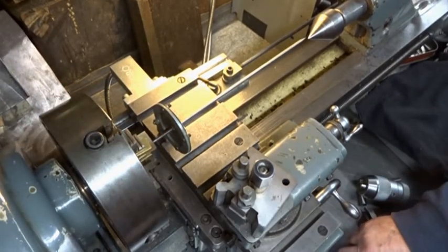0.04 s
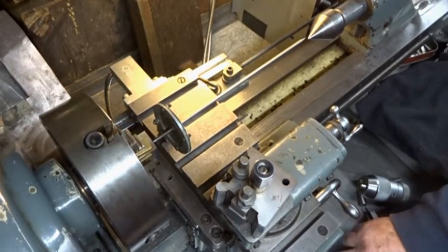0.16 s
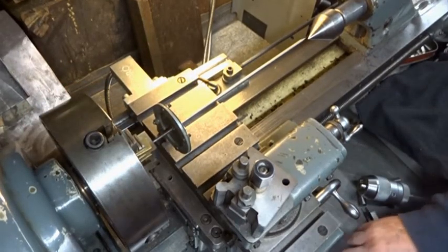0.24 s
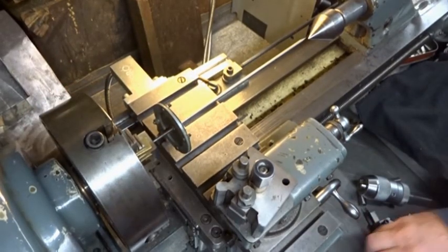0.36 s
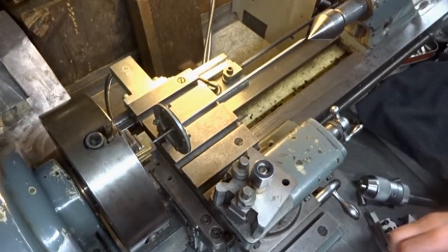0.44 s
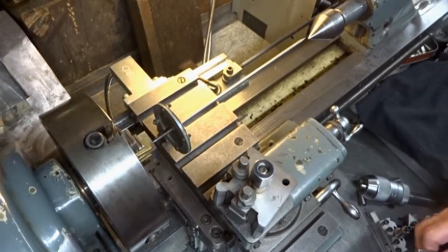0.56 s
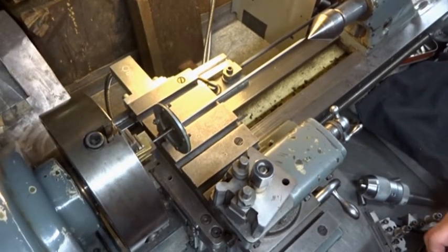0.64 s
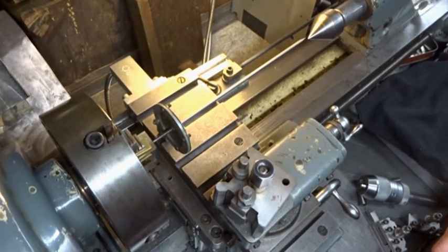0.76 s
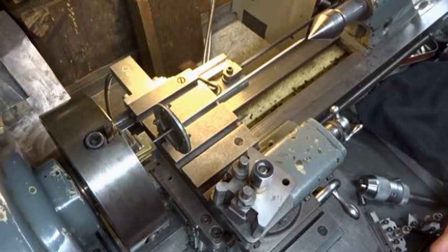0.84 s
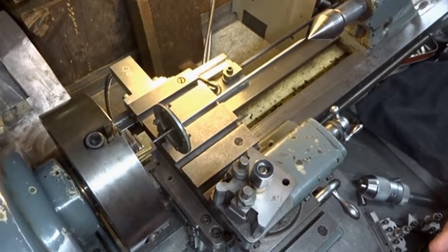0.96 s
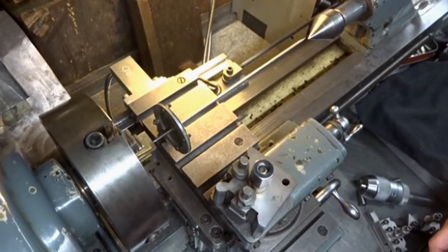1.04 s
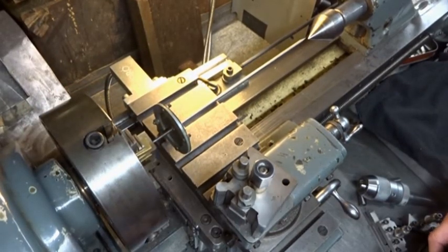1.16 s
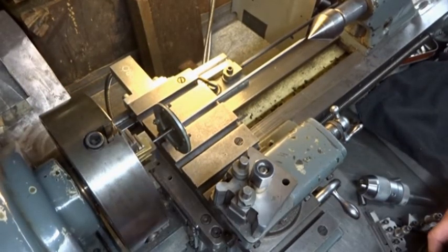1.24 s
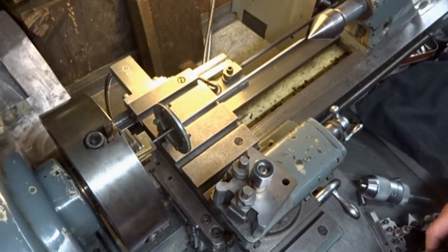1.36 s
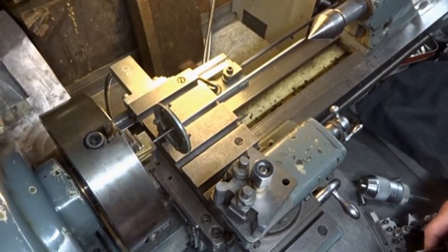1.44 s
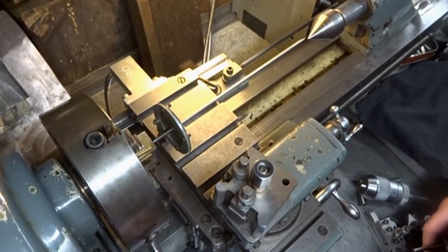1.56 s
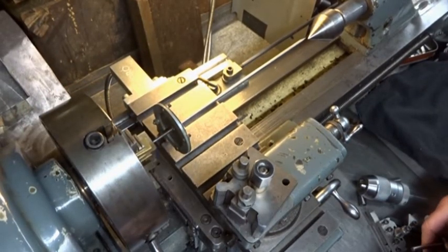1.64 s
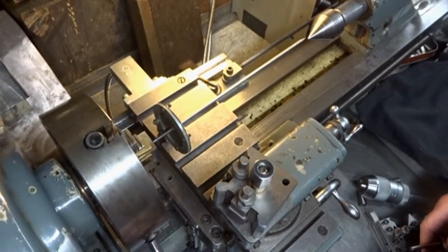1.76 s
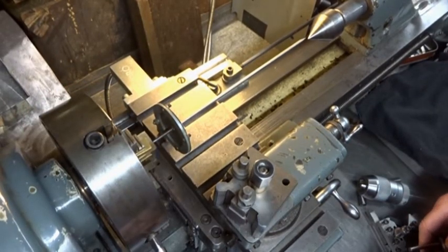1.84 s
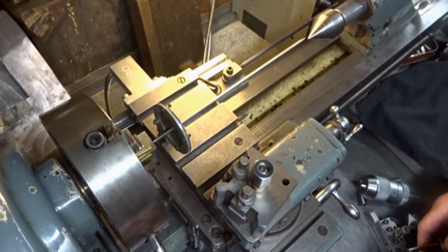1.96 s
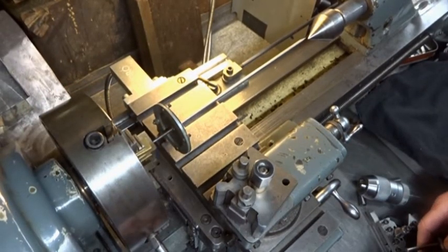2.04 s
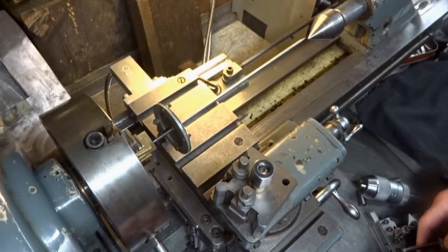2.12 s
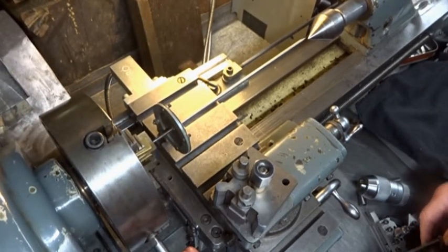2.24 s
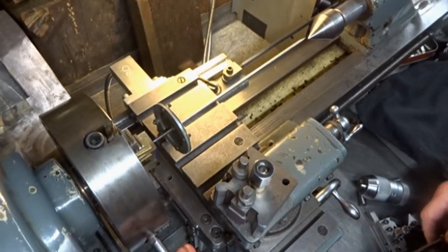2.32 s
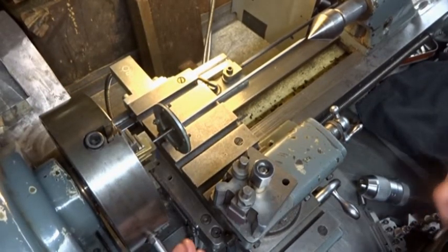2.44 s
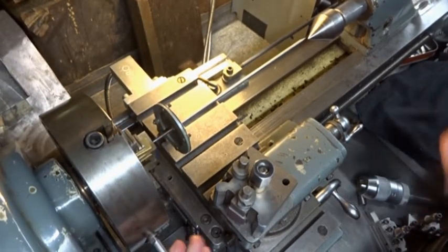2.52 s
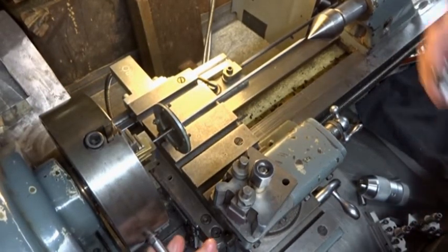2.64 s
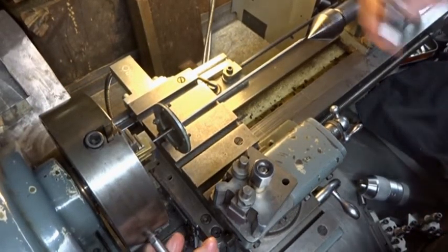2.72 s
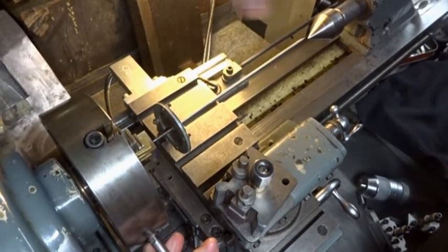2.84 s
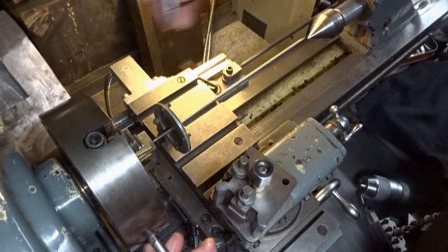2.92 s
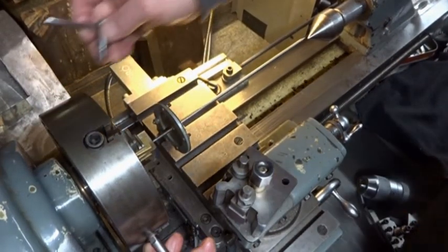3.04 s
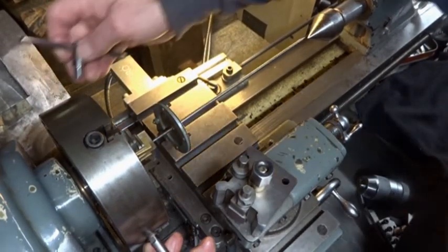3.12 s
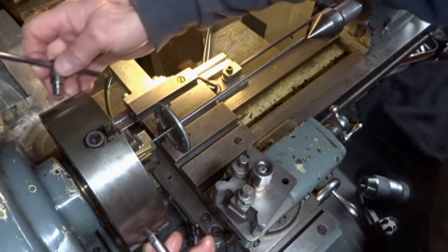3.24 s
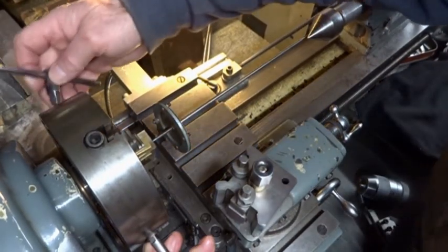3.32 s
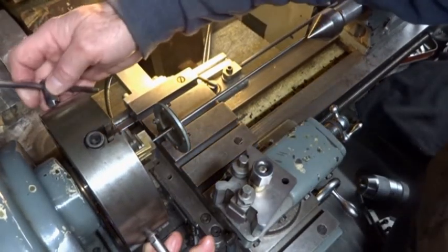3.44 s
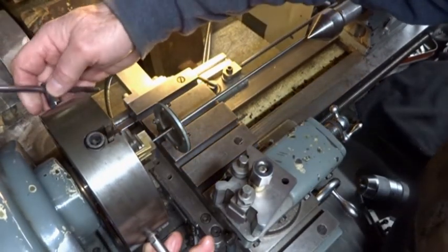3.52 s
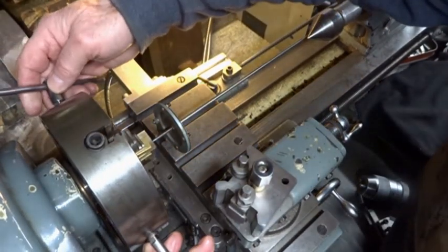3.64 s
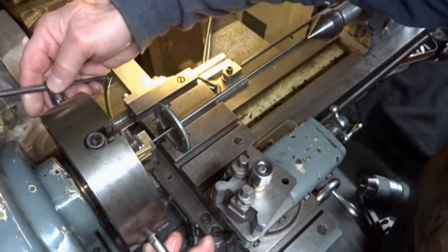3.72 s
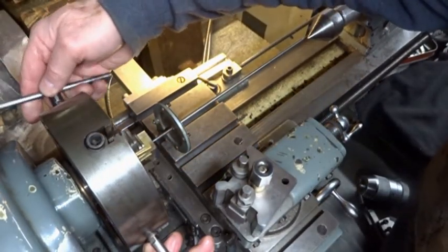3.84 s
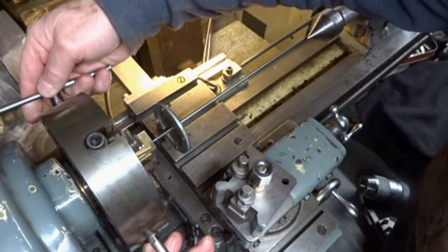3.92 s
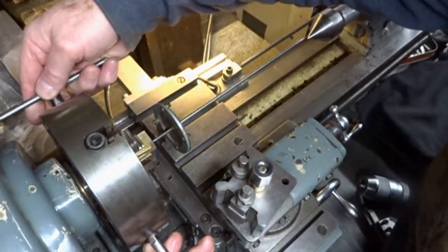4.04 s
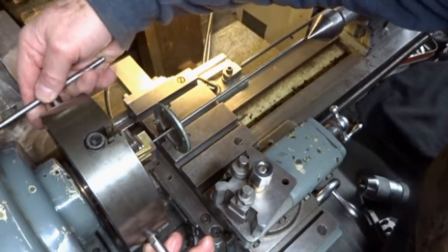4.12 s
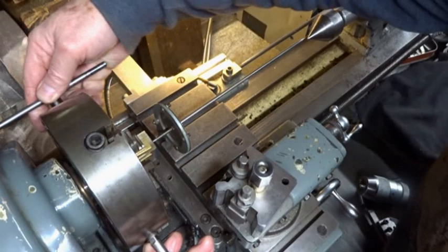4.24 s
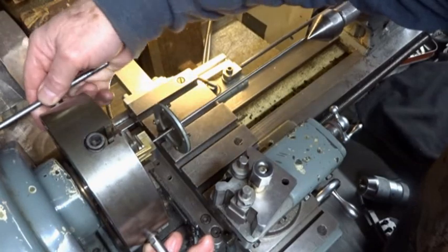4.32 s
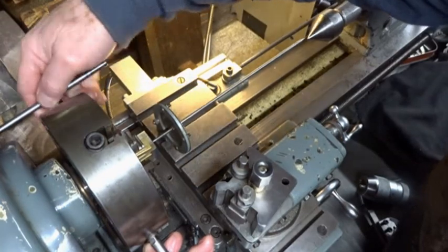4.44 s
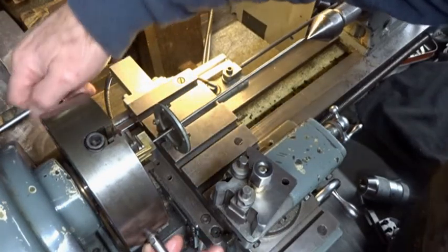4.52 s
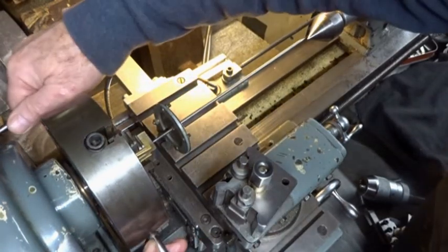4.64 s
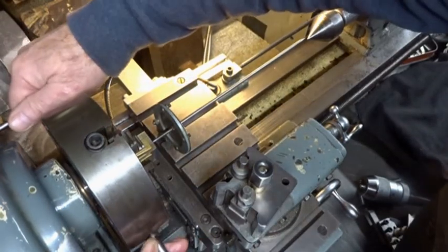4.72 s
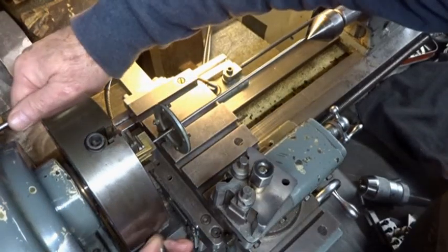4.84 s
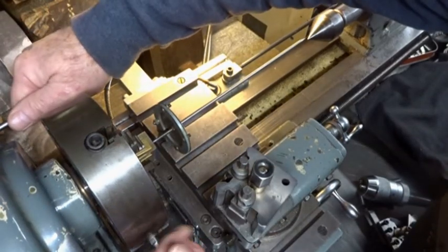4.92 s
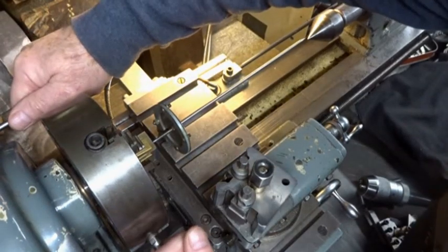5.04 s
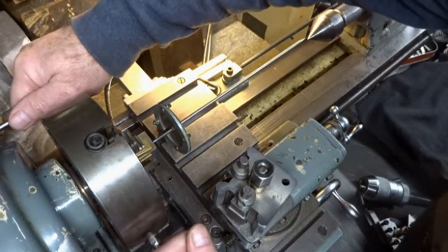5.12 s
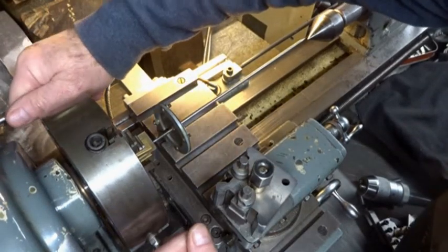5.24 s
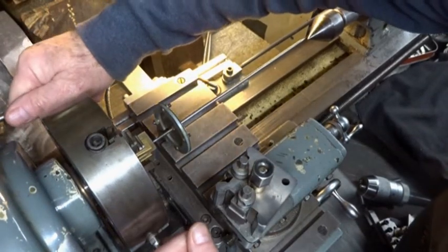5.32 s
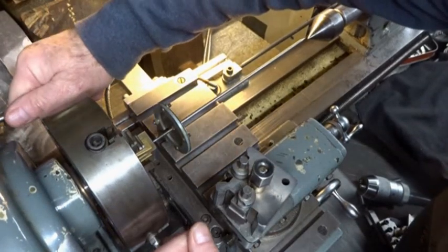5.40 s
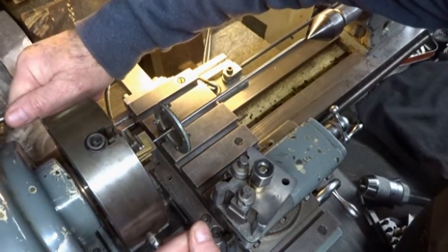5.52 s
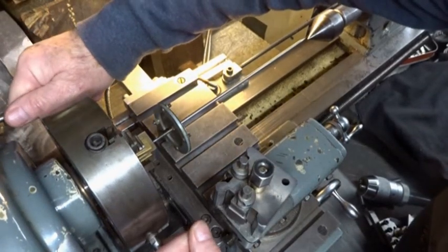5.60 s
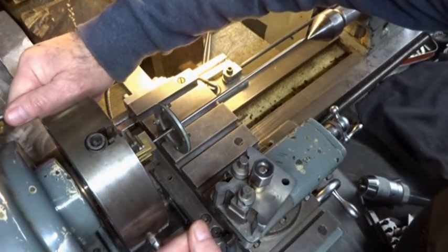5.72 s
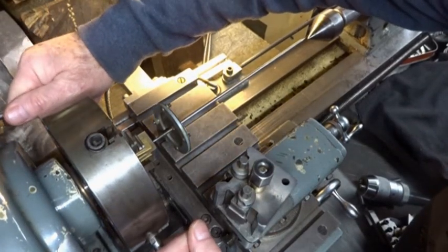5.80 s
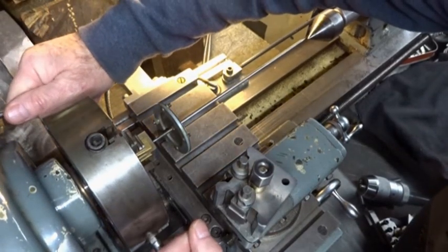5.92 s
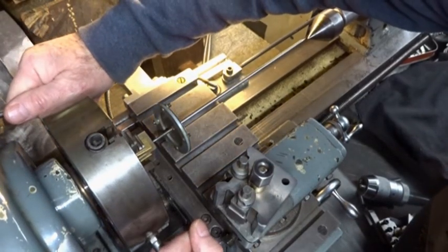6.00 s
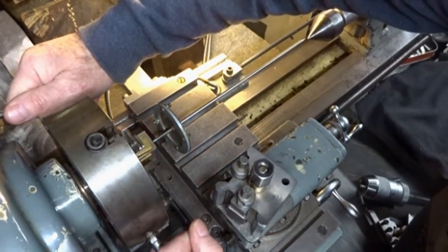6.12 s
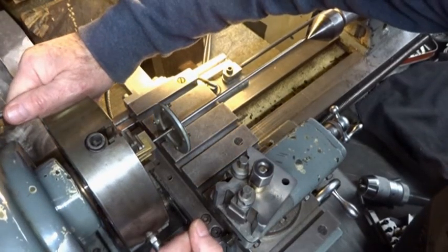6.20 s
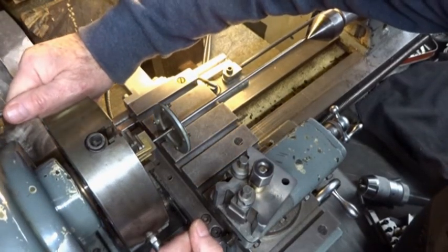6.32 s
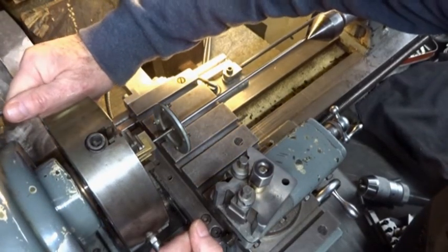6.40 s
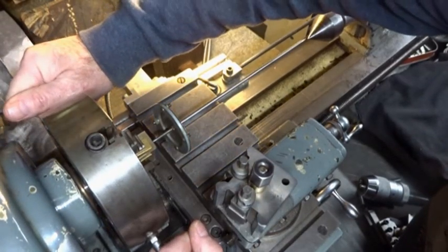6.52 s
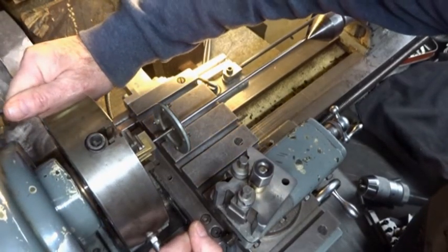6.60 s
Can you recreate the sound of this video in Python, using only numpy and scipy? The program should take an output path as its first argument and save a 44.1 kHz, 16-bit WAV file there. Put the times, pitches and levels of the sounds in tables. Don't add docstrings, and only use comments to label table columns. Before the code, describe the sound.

A metal clang and scraping clatter of steel keys dragged off a tray, then small clicks and rattles as they fit into a lathe chuck.

```python
import sys
import numpy as np
from scipy import signal
from scipy.fft import rfft, irfft, next_fast_len
from scipy.io import wavfile
from scipy.ndimage import map_coordinates

SR = 44100
rng = np.random.default_rng(int(sys.argv[2]) if len(sys.argv) > 2 else 0)


def voltage_ratio(decibels):
    exponent = np.asarray(decibels, float) / 20
    return 10 ** exponent


def file_out(sig):
    cols = np.atleast_2d(sig).T
    lim = np.clip(cols, -1, 1)
    pcm = np.round(lim * 32767).astype(np.int16)
    wavfile.write(sys.argv[1], SR, pcm)


N = 293688


def unit(x):
    return x / np.sqrt(np.mean(x ** 2) + 1e-20)


def peaked(x):
    return x / np.abs(x).max()


def along(points, hz):
    f, v = np.transpose(points)
    return np.interp(np.log(hz + 1), np.log(f + 1), v)


def wobble(rate):
    knots = rng.standard_normal(int(N * rate / SR) + 4)
    return map_coordinates(knots, [np.arange(N) * rate / SR])


def filtered(x, response):
    n = x.shape[-1]
    m = next_fast_len(n + 8192)
    return irfft(rfft(x, m) * response(np.fft.rfftfreq(m, 1 / SR)), m)[..., :n]


def toned(points):
    return lambda hz: voltage_ratio(along(points, hz))


def resonant(peaks):
    def response(f):
        total = 0
        for k, (centre, width, db) in enumerate(peaks):
            mode = 1j * f * width / (centre * centre - f * f + 1j * f * width)
            total = total + (-1) ** k * voltage_ratio(db) * mode
        return total
    return response


def paired(two, alike):
    def mid_side(hz):
        turn = np.arccos(np.clip(along(alike, hz), -1, 1)) / 2
        return np.array([np.cos(turn), np.sin(turn)])
    mid, side = filtered(two, mid_side)
    return np.array([mid + side, mid - side])


def rush(response, alike, grain_db, grain_hz=120):
    rough = voltage_ratio(grain_db * wobble(grain_hz)) * rng.standard_normal((2, N))
    return unit(paired(filtered(rough, response), alike))


def strokes(rows, lift_db=0, per_db=0):
    swell_from_db = 11
    t = np.arange(N) / SR
    gains = []
    for row in rows:
        s, swell, top_db, t60 = row[:4]
        after = t - s - swell
        shape = np.where(after < 0, swell_from_db * after / swell, -60 * after / t60) + top_db
        gains.append(voltage_ratio(np.maximum(shape, -200) + lift_db + per_db * row[-1]))
    return np.max(gains, axis=0)


# f/Hz, t60/s
SHOP_DECAY = [(200, 0.64), (1000, 0.43), (4000, 0.22), (12000, 0.031)]
# f/Hz, likeness/1
ROOM_ALIKE = [(200, 0.62), (2000, 0.6), (12000, 0.78)]


def echo(x):
    hz, t, z = signal.stft(rng.standard_normal((2, len(x))), SR, nperseg=256)
    decay = voltage_ratio(-60 * t / along(SHOP_DECAY, hz)[:, None])
    tail = signal.istft(z * decay, SR, nperseg=256)[1]
    walls = tail / np.linalg.norm(tail[0])
    both = signal.fftconvolve(x[None], walls, axes=1)[:, :len(x)]
    return paired(both, ROOM_ALIKE)


def add(out, s, near, room_db):
    out[:, round(s * SR):][:, :near.shape[1]] += near + voltage_ratio(room_db) * echo(near.mean(0))


# f/Hz, likeness/1
NEAR_ALIKE = [(60, 0.92), (240, 0.9), (950, 0.95), (3800, 0.88), (15000, 0.93)]


def blow(t60, top_db, tone, steel, ring_db, body, knock_db, chatter, knock_t60):
    t = np.arange(SR // 2) / SR
    rise_s, first_share = 0.00099, 0.91
    meeting = 1 - (1 - first_share) * np.exp(-t / rise_s)

    def bright(hz):
        return toned(tone)(hz) * voltage_ratio(top_db / (1 + (6500 / (hz + 1)) ** 6))

    fading = meeting * voltage_ratio(-60 * t ** 2 / (t + 0.21 * t60) / t60)
    clatter = peaked(filtered(rng.standard_normal((2, len(t))), bright) * fading)
    rebounds = rng.standard_normal(len(t)) ** 3 * voltage_ratio(-60 * t / (0.44 * t60)) * meeting
    ring = peaked(filtered(rebounds, resonant(steel)))
    push = rng.standard_normal((2, len(t))) * t / (chatter + t) * voltage_ratio(-60 * t / knock_t60)
    knock = peaked(filtered(push, resonant(body)))
    return paired(clatter + voltage_ratio(knock_db) * knock, NEAR_ALIKE) + voltage_ratio(ring_db) * ring


def taps(hits, steel, tone, body, grip, chatter, knock_t60, room_db, ring_db):
    out = np.zeros((2, N + SR))
    held = np.multiply(steel, [1, grip, 1])
    for s, db, knock_db, hard_db, t60 in hits:
        woken_db = ring_db + 0.9 * hard_db
        sound = blow(t60, hard_db, tone, held, woken_db, body, knock_db, chatter, knock_t60)
        add(out, s, voltage_ratio(db) * sound, room_db)
    return out[:, :N]


# t/s, peak level/dB, relative knock level/dB, hardness/dB, clatter t60/s
TRAY_HITS = [
    (0.0006, -9.5, -12, -2, 0.11),
]
SHIFT_HITS = [
    (0.2278, -20, -8, -9, 0.13),
]
CLACK_HITS = [
    (0.8888, -10.5, -3.5, 5.7, 0.13),
]
# f/Hz, width/Hz, level/dB
TRAY_STEEL = [(1260, 50, 2), (1512, 65, 0), (2980, 68, -4), (3780, 60, -6.5), (6170, 70, -4), (7700, 51, 3),
              (8990, 40, -16), (11900, 200, -14), (13080, 140, -18)]
SHIFT_STEEL = [(1770, 46, 2), (2680, 100, -10), (3380, 160, -1), (7000, 80, -6), (8200, 200, -6.5)]
CLACK_STEEL = [(2612, 63, 1), (3420, 100, -2.5), (4730, 80, -13), (5400, 120, -8), (6680, 70, -12),
               (7200, 60, -2), (7600, 120, -5.5), (8520, 90, -10), (9860, 90, -8), (9690, 90, -11),
               (10350, 110, 0.5), (11190, 110, -11), (12270, 100, -8), (15050, 500, -4)]
# f/Hz, level/dB per Hz
TRAY_TONE = [(880, -8), (1500, -5.5), (1610, -11), (2660, -12), (4080, -12.5), (5070, -16), (9100, -16.5),
             (10300, -16), (16000, -20)]
# f/Hz, width/Hz, level/dB
PAN = [(445.6, 15, 6.5), (678, 27, -2), (806, 53, 3), (1176, 44, -6), (1403, 60, -8)]


def tray_blows():
    tray = taps(TRAY_HITS, TRAY_STEEL, TRAY_TONE, PAN, grip=1.1, chatter=0.0011, knock_t60=0.17,
                room_db=-18.5, ring_db=-0.5)
    shift = taps(SHIFT_HITS, SHIFT_STEEL, TRAY_TONE, PAN, grip=0.5, chatter=0.003, knock_t60=0.12,
                 room_db=-17, ring_db=-2.0)
    clack = taps(CLACK_HITS, CLACK_STEEL, TRAY_TONE, PAN, grip=0.6, chatter=0.0013, knock_t60=0.14,
                 room_db=-23.5, ring_db=-5)
    return tray + shift + clack


# t/s, level/dB
BOOMS = [
    (0, -48.5),
    (.225, -55),
    (0.282, -50.5),
    (.392, -50.5),
    (.888, -57),
    (4.18, -64.5),
]
# f/Hz, width/Hz, level/dB
BENCH_MODES = [(97, 22, -9.5), (193.6, 24, 2.5), (261, 79, -1), (354, 13, 1)]


def bench():
    swell_s, t60 = 0.013, 0.46
    booms = strokes([(s, swell_s, db, t60) for s, db in BOOMS])
    hum = strokes(DRAG, lift_db=-29.5)
    return (booms + hum) * rush(resonant(BENCH_MODES), NEAR_ALIKE, grain_db=3.0)


# f/Hz, level/dB per Hz
FAN_TONE = [(12, -73), (20, -26), (76, -41.5), (209, -31), (240, -33.5), (317, -21), (386, -20), (482, -17),
            (637, -16.5), (754, -13), (1110, -17), (1470, -8.5), (2880, -27), (4500, -33), (15800, -35.5)]
# f/Hz, width/Hz, level/dB
FAN_DUCT = [(1300, 190, -6), (1480, 78, 2), (1651, 51, 0), (2100, 62, -8), (4530, 400, -22)]
# f/Hz, likeness/1
FAN_ALIKE = [(60, 0.85), (180, 0.072), (550, -0.63), (1650, -0.41), (4970, 0.073), (15000, 0.79)]


def fan():
    hiss = rush(toned(FAN_TONE), FAN_ALIKE, grain_db=-0.7)
    waver = voltage_ratio(1.2 * wobble(12))
    duct = voltage_ratio(0.5) * waver * rush(resonant(FAN_DUCT), FAN_ALIKE, grain_db=-2.0)
    return voltage_ratio(-57) * (hiss + duct)


# t/s, swell/s, top level/dB, fade t60/s, pressure/dB
DRAG = [(.05, 0.074, -42, 1.43, 0), (.235, .015, -43.5, 0.43, -2), (.425, 0.054, -39, 0.2, 7.5),
        (.44, 0.057, -33.5, 0.29, -20), (.5, 0.056, -49.5, 0.53, 2.5), (.63, 0.032, -48.5, 0.33, -4),
        (.722, 0.012, -41.5, 0.68, -17), (.74, 0.061, -38, 0.5, -1.5), (.78, 0.048, -33.5, 1, -3),
        (.81, 0.069, -31, 0.054, -3), (.895, 0.037, -29.5, 0.15, 7), (.94, .027, -38.5, .06, 8.5),
        (.98, 0.0084, -54.5, 1.1, 11), (1, 0.19, -69.5, 0.66, 21.5)]
# f/Hz, width/Hz, level/dB
DRAG_BODY = [(328, 43, -6), (467, 59, -2.5), (623, 140, -6), (885, 40, 5), (1190, 83, -10.5),
             (1348, 67, -1), (1770, 91, -13)]
SLIDE_BODY = [(480, 116, -4.5), (644, 107, -4), (950, 170, -6), (1324, 38, 2), (1515, 20, 2),
              (1760, 400, -13)]
# f/Hz, width/Hz, level/dB
RUNNER = [(2340, 90, 7), (2856, 90, 6), (3360, 120, -1.5), (3890, 210, -10), (4700, 120, -11.5),
          (5150, 92, -6), (6770, 195, -10), (8800, 140, -23)]
# f/Hz, level/dB per Hz
DRAG_RASP = [(1180, -40), (2000, 1.5), (2500, -5), (2780, -5.5), (3820, -7), (5440, -7), (6500, -7),
             (8450, -33), (14300, -120)]
DRAG_HISS = [(3530, 0), (6000, -10), (7090, -4), (8510, -8), (10700, -10), (13100, -7), (16200, -17)]


def dragging():
    body = strokes(DRAG)
    rasp = strokes(DRAG, lift_db=-13, per_db=0.91)
    hiss = strokes(DRAG, lift_db=-7, per_db=0.9)
    late = np.arange(N) / SR > .722
    high = rush(resonant(SLIDE_BODY), NEAR_ALIKE, grain_db=3.0, grain_hz=89.9)
    deep = rush(resonant(DRAG_BODY), NEAR_ALIKE, grain_db=3.5, grain_hz=44.96)
    drone = body * np.where(late, high, deep)
    grit = rush(toned(DRAG_RASP), NEAR_ALIKE, grain_db=4, grain_hz=200)
    singing = late * voltage_ratio(2.5) * rush(resonant(RUNNER), NEAR_ALIKE, grain_db=2.0)
    fine = rush(toned(DRAG_HISS), NEAR_ALIKE, grain_db=-1.0)
    return drone + rasp * (grit + singing) + hiss * fine


# t/s, peak level/dB, relative knock level/dB, t60/s, mode f/Hz
PINGS = [(0.1667, -45, 13.5, 0.1, 8250), (2.355, -48.5, -5, 0.055, 8380), (2.8885, -48.5, 12, 0.046, 2970),
         (3.127, -52, 7, 0.043, 4030), (3.13, -55, -2, .12, 3050), (3.2, -56, -20, .05, 11900),
         (3.5014, -49, -8, 0.044, 3460), (3.522, -37.5, -10, 0.056, 3480), (3.524, -52, -15, .05, 4520),
         (3.539, -39.5, -12, 0.08, 3420), (3.549, -52, -15, 0.036, 7750), (3.552, -46.5, -5, 0.076, 1900),
         (3.594, -51, 13, 0.05, 7750)]
# t/s, peak level/dB, relative knock level/dB, knock f/Hz, hardness/dB
TICKS = [(0.2836, -48, 7, 475, -19), (0.73, -56, 3, 1400, -23), (.7597, -47, 6, 1470, -21),
         (0.784, -45, 6, 1500, -21), (0.8139, -41.5, 13, 1510, -24), (0.859, -41, 10, 1404, -23),
         (0.8672, -41.5, 10, 1300, -21), (.877, -47, 10, 1336, -23), (.404, -38, 10.5, 885, -15),
         (0.9197, -31, -5, 1140, -9), (0.9477, -25.5, -10.5, 1310, -18), (.978, -51, 12, 1310, -19),
         (1.6761, -41.5, -6.5, 475, -28), (1.8543, -50.5, 1, 600, -22), (1.9908, -53, -9, 686, -9),
         (2.3193, -53, 11, 425, -4), (2.334, -53, 14.5, 434, -13), (2.369, -56, 10.5, 480, -15),
         (2.525, -52, 0, 506, -7), (2.8445, -55, 6.5, 706, -7), (3.074, -37, -13, 1300, -7.5),
         (3.6064, -53.5, 13, 670, -13), (3.6171, -49, 9.5, 534, -12), (4.0064, -54.5, 5, 1317, -16),
         (4.181, -50, 11.5, 1150, -5), (4.275, -54, 4, 1380, -19), (4.334, -55, 18.5, 418, -11),
         (4.421, -57.5, 18.5, 471, -15), (4.4679, -41.5, -8.5, 323, -18), (4.702, -37, -10.5, 1250, -3),
         (4.745, -62.5, 12, 1490, -15), (4.8, -61.5, 13, 1415, -11), (5.283, -48, -0.5, 470, 1),
         (5.3072, -41.5, -20, 716, -5.5)]
# f/Hz, level/dB per Hz
TICK_TONE = [(1060, -11.5), (1800, -11.5), (2840, -11), (5250, -13.5), (6360, -7.5), (9080, -13.5),
             (16000, -16.5)]
# f/Hz, width/Hz, level/dB
SHANK = [(3390, 83, 0), (4600, 290, -0.5), (6700, 220, -8), (7720, 120, 0.5), (8700, 200, -1)]
# f/Hz, width/Hz, level/dB
CHUCK = [(432, 33, 4), (689, 64, 1), (871, 53, -3.5), (1150, 36, 0), (1479, 48, -1.5)]


def ticks():
    out = np.zeros((2, N + SR))
    for s, db, knock_db, t60, mode_hz in PINGS:
        steel = [(mode_hz, 1.7 / t60, 0)]
        ping = blow(t60, -25, TICK_TONE, steel, 4, CHUCK, knock_db, chatter=.004, knock_t60=.04)
        add(out, s, voltage_ratio(db - 4) * ping, room_db=-15)
    for s, db, knock_db, knock_hz, top_db in TICKS:
        body = [(knock_hz, 45, 0), (2.57 * knock_hz, 500, -20)]
        tick = blow(0.052, top_db, TICK_TONE, SHANK, -11.0, body, knock_db, chatter=0.0023, knock_t60=0.081)
        add(out, s, voltage_ratio(db + 1.5) * tick, room_db=-10)
    return out[:, :N]


# t/s, peak level/dB, relative knock level/dB, hardness/dB, clatter t60/s
LIFT_HITS = [
    (0.3908, -18.5, 9.3, 1.5, 0.1),
]
# f/Hz, width/Hz, level/dB
LIFT_STEEL = [(2993, 40, -2.5), (3370, 70, 2), (5453, 50, -10), (6910, 150, -5.5), (7725, 40, 4),
              (8200, 90, 9), (8985, 50, -8), (11830, 110, 0), (12650, 110, 3.5), (13180, 110, -1)]
# f/Hz, level/dB per Hz
LIFT_TONE = [(880, -11), (1500, 2.5), (2160, -12), (2340, -39), (3280, -2), (3660, -12), (5770, -16),
             (7920, -2.5), (10700, -20), (13100, -14), (16000, -23)]
# f/Hz, width/Hz, level/dB
BOX = [(460, 30, -13), (885, 52, 3), (1094, 74, -7), (1270, 51, -14), (1700, 130, -26)]


def lift_off():
    return taps(LIFT_HITS, LIFT_STEEL, LIFT_TONE, BOX, grip=0.95, chatter=0.0019, knock_t60=0.044,
                room_db=-13.5, ring_db=-2)


# t/s, swell/s, top level/dB, fade t60/s, fineness/dB
RUB = [(2.41, 0.088, -60.5, 0.91, 6), (2.66, 0.32, -61, 13, 2), (3.2, 0.11, -60, 2.2, 0.5),
       (3.75, 0.1, -78, 2.5, 8), (4.17, 0.063, -64.5, 1.3, 5), (4.44, 0.12, -56.5, 1.3, 3.5),
       (4.66, 0.048, -61.5, 1.9, -1), (5.25, 0.054, -61.5, 0.54, -3)]
# t/s, swell/s, top level/dB, fade t60/s
PALM = [(1.21, 0.032, -62, 0.36), (2.842, 0.007, -54, 0.12), (2.886, 0.0077, -56, 0.24),
        (3.03, 0.067, -58, 2.6), (3.43, 0.018, -59, 1.7), (4.18, 0.0071, -63.5, 1.2),
        (4.44, 0.069, -74, 0.46), (4.55, 0.13, -64.5, 1.34)]
# f/Hz, level/dB per Hz
SWISH = [(1290, -20), (2200, 3.5), (2800, -5), (3020, -1.5), (5580, -0.5), (6320, -1), (7070, -0.5),
         (9000, -13), (11700, -42), (19800, -120)]
FIZZ = [(4120, -29), (7000, -11), (9470, -12), (11700, -8), (12700, -9.5), (14700, -6.5), (16200, -23)]
BRUSH = [(120, -24), (200, -17), (300, 3), (450, -4.5), (800, -16.5)]
# f/Hz, width/Hz, level/dB
BAR = [(3053, 40, 8.5), (4080, 50, 3), (4880, 60, 6.5), (5860, 1100, -4.5), (6600, 220, 2.5)]
HANDLE = [(5650, 90, 0), (6870, 160, 1), (7750, 300, 3), (12050, 2300, -4)]


def rustle():
    swish = strokes(RUB, per_db=-0.23)
    fizz = strokes(RUB, per_db=0.81)
    turning = np.arange(N) / SR > 3.45
    handle = rush(resonant(HANDLE), NEAR_ALIKE, grain_db=2.5)
    sliding = rush(resonant(BAR), NEAR_ALIKE, grain_db=-4.5)
    bar = np.where(turning, handle, sliding)
    waver = voltage_ratio(-2.5 + 2.5 * wobble(8))
    cloth = swish * (rush(toned(SWISH), NEAR_ALIKE, grain_db=0.0) + waver * bar)
    cloth += fizz * rush(toned(FIZZ), NEAR_ALIKE, grain_db=2, grain_hz=40)
    return cloth + strokes(PALM) * rush(toned(BRUSH), NEAR_ALIKE, grain_db=-1.0)


# t/s, swell/s, top level/dB, fade t60/s, depth/dB
JIGGLE = [
    (1.85, 0.027, -51, 0.67, -2.5),
    (3.45, 0.0076, -59, .3, 7),
    (3.5, 0.039, -45, 0.35, -7),
    (3.59, 0.04, -53, 0.59, -2),
]
# f/Hz, width/Hz, level/dB
SOCKET = [(506, 14, 2.5), (790, 180, -6.5), (1140, 18, -2.5)]
SCREW = [(1780, 190, 7), (2430, 310, 2.5)]


def jiggling():
    chuck = strokes(JIGGLE)
    screw = strokes(JIGGLE, lift_db=2, per_db=0.95)
    key = strokes(JIGGLE, lift_db=-9.5)
    low = chuck * rush(resonant(SOCKET), NEAR_ALIKE, grain_db=-3.5, grain_hz=69.2)
    low += screw * rush(resonant(SCREW), NEAR_ALIKE, grain_db=2.0, grain_hz=68.4)
    return low + key * rush(resonant(SHANK), NEAR_ALIKE, grain_db=7, grain_hz=50)


# t/s, peak level/dB, relative knock level/dB, hardness/dB, clatter t60/s
FRONT_HITS = [
    (1.8874, -22, -7, 9.5, 0.094),
]
GRAZE_HITS = [
    (2.0255, -52.5, -3.5, -2, 0.11),
]
TURN_HITS = [
    (2.179, -39.5, -9, 7, 0.2),
    (2.2018, -30, -9, 4.8, 0.046),
]
# f/Hz, width/Hz, level/dB
FRONT_STEEL = [(1450, 49, 8), (2780, 18, 11), (3530, 45, -0.5), (4750, 120, 4), (5590, 60, 13),
               (5750, 91, 15), (6140, 130, 2), (7820, 80, 1), (8400, 110, 18.5), (9442, 65, 2),
               (10220, 80, 2), (11140, 80, -1)]
GRAZE_STEEL = [(2780, 250, -2), (3180, 250, -3), (8200, 300, -17)]
TURN_STEEL = [(2200, 140, -10), (2807, 30, 5), (3480, 43, 1), (3520, 30, 2.5), (3736, 95, 0),
              (4580, 60, -16), (8300, 110, -5), (9800, 160, -16.5)]
# f/Hz, level/dB per Hz
FRONT_TONE = [(880, -25), (1500, -4.5), (2410, -5), (2830, -4), (5020, -9.5), (5770, -13), (7170, -16.5),
              (8320, -14.5), (16000, -32.5)]


def front_screw():
    front = taps(FRONT_HITS, FRONT_STEEL, FRONT_TONE, CHUCK, grip=0.72, chatter=0.016, knock_t60=0.13,
                 room_db=-11.5, ring_db=-5.5)
    graze = taps(GRAZE_HITS, GRAZE_STEEL, FRONT_TONE, CHUCK, grip=0.92, chatter=0.008, knock_t60=0.12,
                 room_db=-4, ring_db=10.5)
    turn = taps(TURN_HITS, TURN_STEEL, FRONT_TONE, CHUCK, grip=1.14, chatter=0.013, knock_t60=0.14,
                room_db=-10.0, ring_db=-5.0)
    return front + graze + turn


# t/s, peak level/dB, relative knock level/dB, hardness/dB, clatter t60/s
REAR_HITS = [
    (3.4288, -22.5, -9, -1.2, 0.067),
]
# f/Hz, width/Hz, level/dB
REAR_STEEL = [(1900, 50, -7), (1967, 27, -5), (2364, 64, -1), (2555, 40, -24), (2763, 39, 6.5),
              (3570, 50, -11), (4110, 50, -2), (4690, 89, -8), (5040, 200, -17), (7700, 61, 6),
              (8380, 140, -7), (9800, 100, -17), (11550, 200, -19)]
# f/Hz, level/dB per Hz
REAR_TONE = [(880, -23), (1500, -11), (2340, -2.5), (2970, -9), (4730, -9), (6560, -25), (7920, -12),
             (9010, -22), (16000, -41)]
# f/Hz, width/Hz, level/dB
JAW = [(410, 38, 3.5), (683, 50, -3), (870, 44, -2), (1250, 50, -5), (1510, 47, -1)]


def rear_screw():
    return taps(REAR_HITS, REAR_STEEL, REAR_TONE, JAW, grip=0.91, chatter=0.0073, knock_t60=0.17,
                room_db=-12.5, ring_db=5.0)


# t/s, peak level/dB, relative knock level/dB, hardness/dB, clatter t60/s
SEAT_HITS = [
    (3.6938, -28, -6.5, 6.8, 0.028),
]
NUDGE_HITS = [
    (4.0385, -32, -9, -8, 0.058),
    (4.1835, -47, 10.5, 3, 0.11),
]
# f/Hz, width/Hz, level/dB
SEAT_STEEL = [(2530, 55, -20), (3400, 160, -18), (4080, 170, -15), (5060, 110, -10), (6730, 120, -14),
              (8310, 67, 2), (8640, 40, -0.5), (9300, 110, -13), (10750, 70, -20)]
NUDGE_STEEL = [(1500, 80, 2), (2900, 150, -12), (4260, 200, -10), (7440, 300, -13), (8330, 150, 0),
               (9900, 200, -16)]
# f/Hz, level/dB per Hz
SEAT_TONE = [(880, -5), (1500, 9), (2910, -23), (3520, -3.5), (7320, -3), (8570, -2), (10000, -36),
             (13100, -7), (16000, -69)]


def seating():
    seat = taps(SEAT_HITS, SEAT_STEEL, SEAT_TONE, CHUCK, grip=1.15, chatter=0.0083, knock_t60=0.072,
                room_db=-9, ring_db=1.0)
    nudge = taps(NUDGE_HITS, NUDGE_STEEL, SEAT_TONE, CHUCK, grip=0.75, chatter=0.011, knock_t60=0.15,
                 room_db=-11.5, ring_db=6)
    return seat + nudge


def scene():
    steel = tray_blows() + dragging() + ticks() + lift_off()
    steel += jiggling() + front_screw() + rear_screw() + seating()
    steel = filtered(steel, lambda hz: (1j * hz / (260 + 1j * hz)) ** 3)
    return steel + bench() + fan() + rustle()


def roll_off(x):
    return signal.sosfilt(signal.butter(12, 16800, fs=SR, output="sos"), x)


def record(dry):
    def microphone(hz):
        bass = 1j * hz / (55 + 1j * hz)
        top = voltage_ratio(-26 / (1 + (15900 / (hz + 1)) ** 200)) * (hz < 16800)
        return bass * top
    mix = filtered(dry, microphone)
    return roll_off(mix)


dry = scene()
out = record(dry)
file_out(out)
```